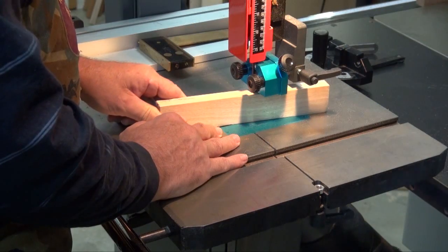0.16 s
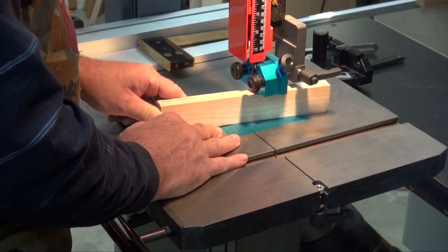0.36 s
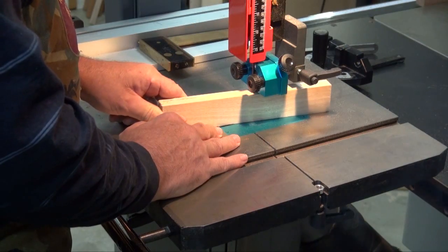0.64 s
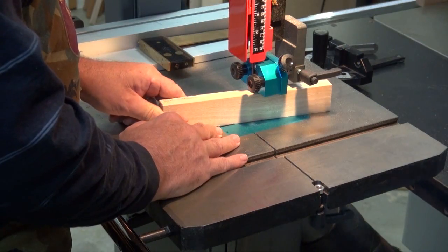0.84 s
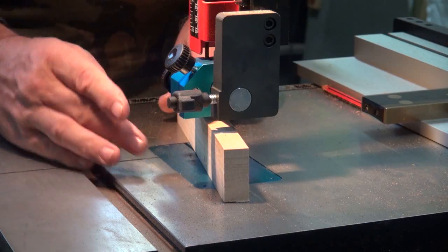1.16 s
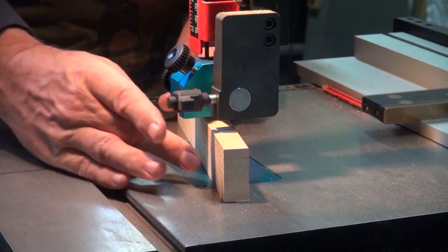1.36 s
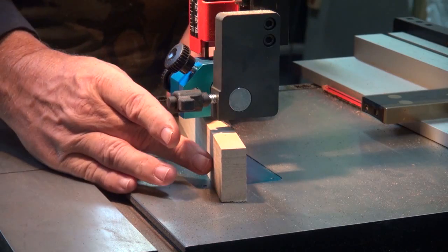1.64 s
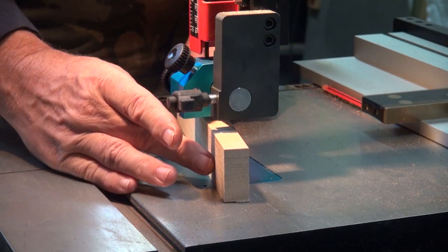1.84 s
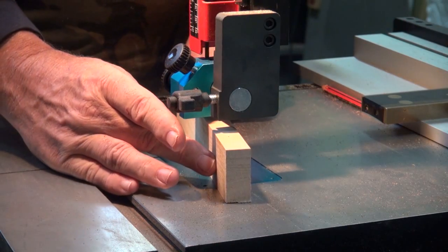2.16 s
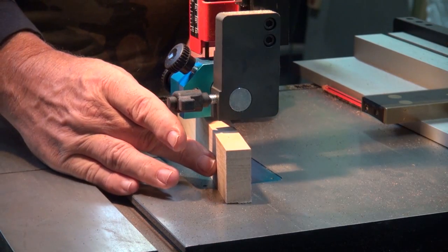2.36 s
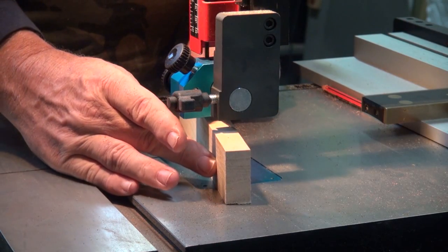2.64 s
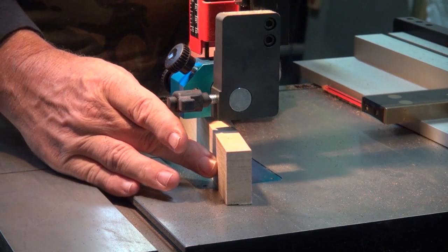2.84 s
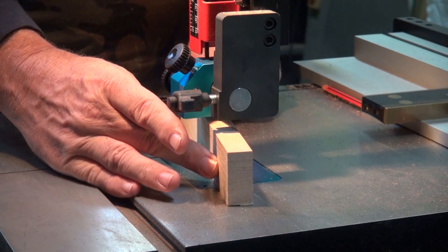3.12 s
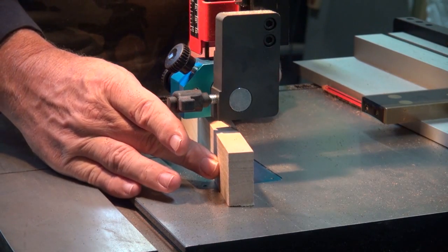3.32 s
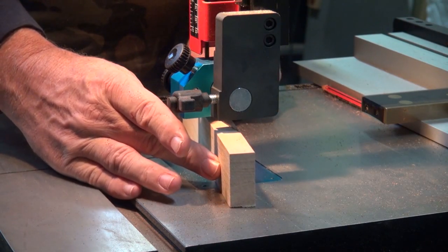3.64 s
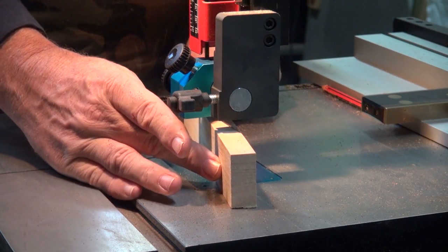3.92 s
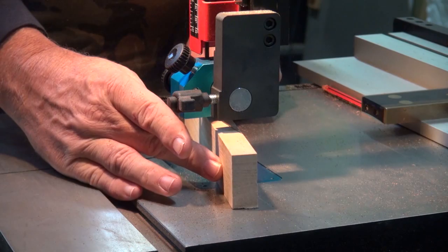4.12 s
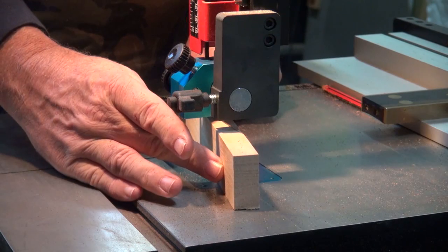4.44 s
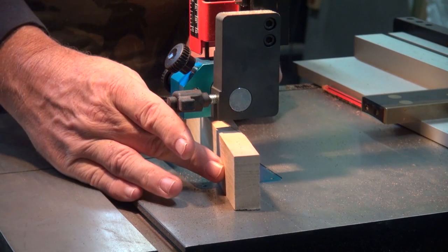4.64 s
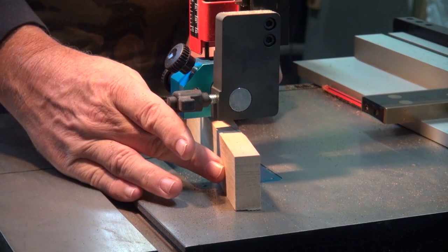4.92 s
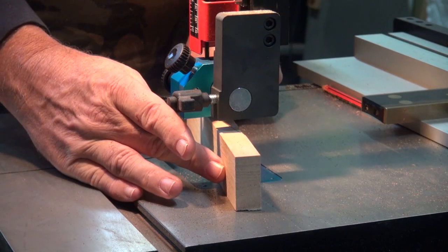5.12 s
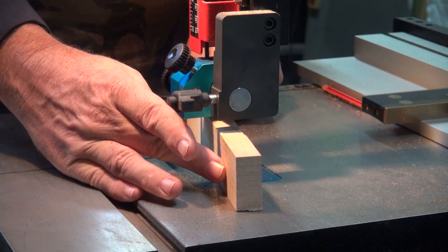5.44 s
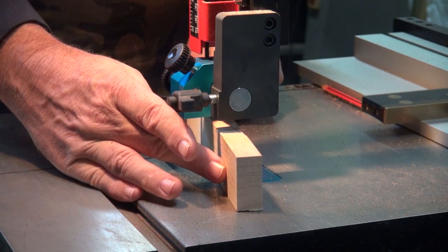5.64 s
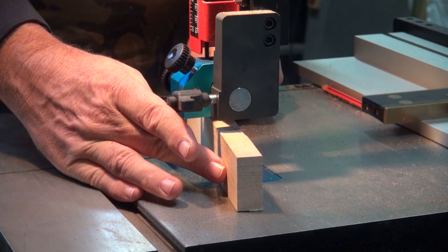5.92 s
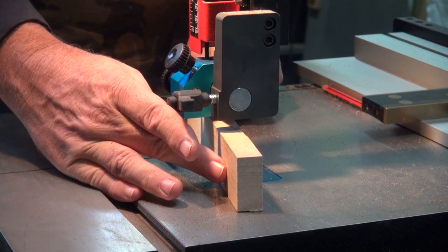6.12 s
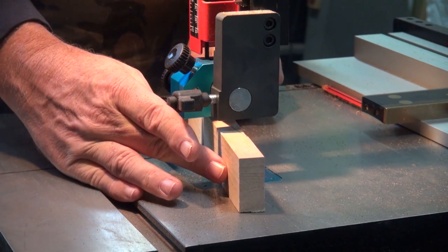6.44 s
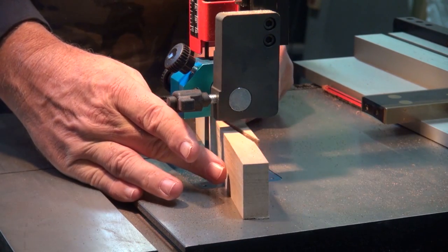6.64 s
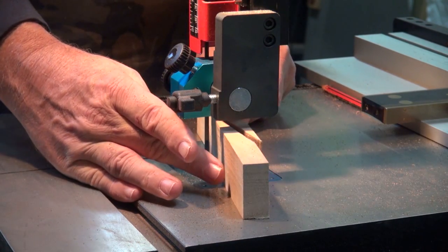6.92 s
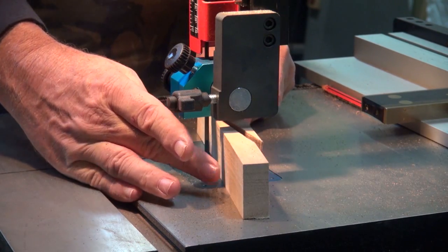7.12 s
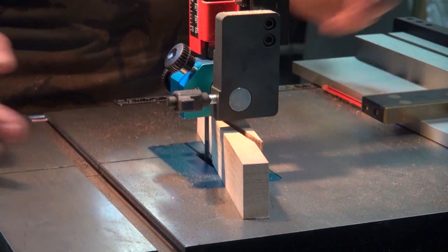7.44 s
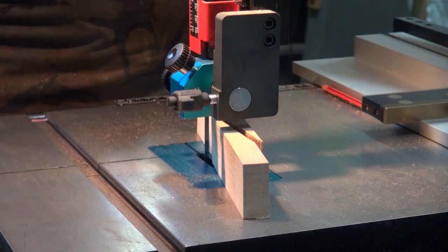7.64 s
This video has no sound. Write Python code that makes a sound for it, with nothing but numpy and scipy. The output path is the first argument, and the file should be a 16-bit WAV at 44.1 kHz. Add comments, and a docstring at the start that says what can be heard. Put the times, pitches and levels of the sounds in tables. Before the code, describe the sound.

In a workshop, a bandsaw blade whines and hisses steadily through wood, with the microphone at its side. Suddenly the microphone is close in front, and a quieter cut builds into a rough, warbling whine with brief squeals and a thin metallic ring. The cutting eases and ends, the freed sliver ticks against the block, and the hum and rattle of the motor come forward as the blade runs free.

```python
"""A workshop, at the bandsaw: a hand-fed block of wood is ripped, one cut with the microphone at the
side, then abruptly another with it close in front. The teeth whine and rasp; the motor rattles the
frame, lifted by the recorder's gain where the cut is quiet. In the second cut the pushed blade chatters
just under the tooth rate, squeals and rings. Near the end it breaks through, the offcut ticks and the
saw runs on empty."""
import sys
import numpy as np
from scipy import signal
from scipy.fft import rfft, irfft, next_fast_len
from scipy.io import wavfile

SR = 44100
rng = np.random.default_rng(int(sys.argv[2]) if len(sys.argv) > 2 else 0)


def dump(signal):
    """Clip the signal to [-1, 1] and save it as 16-bit WAV at the path in sys.argv[1]."""
    limited = np.clip(np.atleast_2d(signal).T, -1, 1)
    pcm = np.round(limited * 32767).astype(np.int16)
    wavfile.write(sys.argv[1], SR, pcm)


N = 343083
TIME = np.arange(N) / SR
FREE_TOOTH_HZ, TEETH_PER_MOTOR_TURN, TEETH_PER_WHEEL_TURN = 1250, 50, 232


def undb(db):
    """Decibels to gain."""
    return 10 ** (np.asarray(db) / 20)


def unit(x):
    """Scale to rms 1."""
    return x / np.sqrt(np.mean(np.abs(x) ** 2))


def curves(rows):
    """The columns of a timed table, sample by sample."""
    times, *columns = np.transpose(rows)
    return [np.interp(TIME, times, column) for column in columns]


def step(at_s, width_s):
    """A smooth change from 0 to 1."""
    return .5 + .5 * np.tanh((TIME - at_s) / width_s)


def bump(at_s, width_s):
    """One smooth rise to 1 and back."""
    return np.exp(-((TIME - at_s) / width_s) ** 2)


def swell(period_s, peak_s):
    """A regular rise and fall between -1 and 1."""
    return np.cos(2 * np.pi * (TIME - peak_s) / period_s)


def phase_of(hz):
    """Phase in radians of a moving rate."""
    return 2 * np.pi * np.cumsum(hz) / SR


def wander(hz):
    """A smooth random drift of rms 1 that changes up to about hz times a second."""
    hop = max(1, int(SR / hz) // 20)
    count = N // hop + 2
    lowpass = signal.butter(2, hz * hop / SR * 2, output="sos")
    slow = signal.sosfilt(lowpass, rng.standard_normal(N + 2)[:count])
    return unit(np.interp(np.arange(N) / hop, np.arange(count), slow))


def resonance(hz, width_hz):
    """A mode shaken at random: a tone whose size and phase drift over its width."""
    phase = phase_of(hz * np.ones(N))
    return unit(wander(width_hz / 2) * np.cos(phase) + wander(width_hz / 2) * np.sin(phase))


def gain_at(spectrum, hz):
    """Read a gain from (freq_hz, level_db) points on a log axis."""
    freq_hz, level_db = np.transpose(spectrum)
    return undb(np.interp(np.log(hz + 1), np.log(freq_hz), level_db))


def shape(x, response):
    """Filter by a gain that is a function of frequency."""
    size = next_fast_len(N + 4096)
    return irfft(rfft(x, size) * response(np.fft.rfftfreq(size, 1 / SR)), size)[:N]


def colour(x, spectrum):
    """Give a sound a spectrum, at rms 1."""
    return unit(shape(x, lambda hz: gain_at(spectrum, hz)))


def cut_gain(hz, cut_db):
    """Gain of a partial: low ones go with the blade's note, higher ones with rasp and sizzle."""
    bands = ([1, 0, 0, 0], [0, 1, 1, 0], [0, 0, 0, 1])
    shares = [np.interp(hz, [1300, 3400, 5200, 7200], band) for band in bands]
    return undb(sum(share * db for share, db in zip(shares, cut_db)))


# Strength of the cut as the hand feeds the wood: time_s, rasp_db, sizzle_db
FEED = [(0, -33.5, -34), (0.15, -31.5, -36), (0.8, -30, -33.5), (1.36, -30.5, -33.5), (1.47, -40.5, -48),
        (1.6, -38, -42.5), (2.02, -35, -40), (2.13, -30, -33), (3.0, -30, -35), (3.27, -31, -32),
        (3.8, -31.5, -35), (4.57, -30.5, -33), (4.92, -33, -37), (6.17, -35, -41.5), (6.45, -37, -38.5),
        (6.66, -48, -55), (7.2, -44.5, -49.5), (7.78, -47.5, -56.5)]
# The hand shoves or eases off, and the blade's note surges or drops: peak_s, width_s, change_db
HAND_SHOVES = [(1.385, 0.036, -4), (2.225, 0.041, 3), (4.126, 0.045, 3), (4.416, 0.054, 3.5),
               (4.74, 0.065, 1), (6.03, 0.025, -7)]


def hand_feed(front, in_wood, full_cut_db=-31, sway_db=1.1, sway_hz=4.7, stumble_db=1.5):
    """Levels in dB of the blade's note, rasp and sizzle, all following the feed."""
    rasp_db, sizzle_db = curves(FEED)
    # the note sways evenly in the first cut and stumbles in the second
    uneven_db = sway_db * (1 - front) * swell(1 / sway_hz, peak_s=.41) + stumble_db * front * wander(12)
    shove_db = sum(db * bump(peak_s, width_s) for peak_s, width_s, db in HAND_SHOVES)
    note_db = full_cut_db + 1 + 0.83 * (rasp_db - full_cut_db) + uneven_db + shove_db
    # once through, the blade brushes the wood on every wheel turn
    brush_db = 1.3 * (1 - in_wood) * swell(TEETH_PER_WHEEL_TURN / FREE_TOOTH_HZ, peak_s=5.5)
    return note_db, rasp_db + brush_db, sizzle_db + brush_db


# Tooth harmonics 1 to 7 by microphone position and feed: side_db, front_light_db, front_heavy_db
TOOTH_HARMONICS = [(-1, -4, -8.5), (-17, -13.5, -33), (-10.5, -7.5, -20), (-3.5, -13.5, -14),
                   (-15, -12.5, -22), (-13.5, -5.5, -9.5), (-9, -4.5, -5)]
# How cleanly those harmonics ring: time_s, boost_db
CLARITY = [(0, 2.5), (1.3, -0.5), (1.45, -2.5), (1.8, -5), (1.92, -6), (2.08, -4), (3.6, 0.5), (4.4, 1),
           (5.6, 0), (6.35, 3), (6.55, 4.5)]
# Teeth set alternately left and right add half orders: tooth_rate_multiple, relative_db
HALF_ORDERS = [(.5, -23), (2.5, -21)]


def whine(tooth_phase, load, front, cut_db, side_jitter_rad=0.19, front_jitter_rad=0.069, flutter_db=1.5):
    """Teeth strike in step; the blade's shiver shifts their timing and frays the upper harmonics."""
    phase = tooth_phase + (side_jitter_rad * (1 - front) + front_jitter_rad * front) * wander(38)
    clarity_db, = curves(CLARITY)
    out = 0
    for k, (side_db, light_db, heavy_db) in enumerate(TOOTH_HARMONICS, 1):
        front_db = light_db + (heavy_db - light_db) * load ** 2
        level_db = side_db * (1 - front) + front_db * front + clarity_db
        level_db += (flutter_db + 1.9 * (1 - front) * (k > 2)) * wander(30)
        # the steel delays each harmonic differently, which smears the strikes into a steady tone
        tone = np.sin(k * phase + rng.uniform(0, 2 * np.pi))
        out += undb(level_db) * cut_gain(k * FREE_TOOTH_HZ, cut_db) * tone
    for k, db in HALF_ORDERS:
        level_db = db - 7.9 * load ** 2 + flutter_db * wander(25)
        out += undb(level_db) * cut_gain(k * FREE_TOOTH_HZ, cut_db) * np.sin(k * phase)
    return np.sqrt(2) * out


# Tearing wood, microphone at the side: freq_hz, relative_db
RASP_AT_SIDE = [(40, -33), (200, -12.5), (700, -6), (1450, 1.5), (2500, -5), (3400, -2.5), (3900, 5),
                (4300, -6), (4700, 5), (5150, 2), (5600, -5.5), (6800, -6), (8100, -4), (8900, 0.5),
                (9600, -2)]
# Tearing wood, microphone close in front: freq_hz, relative_db
RASP_IN_FRONT = [(40, -28.5), (250, -5.5), (700, -3), (1600, 2), (2100, -2.5), (2900, -6), (3350, 0),
                 (4200, -1), (5200, 0), (5750, -5.5), (6700, -5), (7700, 3), (8900, 1), (9600, -2)]


def rasp(tooth_phase, load, front, cut_db, bite=0.37, grain_db=1.0, side_db=-1, heavy_feed_db=-4):
    """Each tooth tears a burst of fibres; the bursts differ in size."""
    _, rasp_db, sizzle_db = cut_db
    bursts = rng.standard_normal(N) * (1 + bite * np.cos(tooth_phase)) * undb(grain_db * wander(350))
    at_side = colour(bursts, RASP_AT_SIDE) * undb(side_db)
    in_front = colour(bursts, RASP_IN_FRONT) * undb(heavy_feed_db * load)
    tearing = at_side * (1 - front) + in_front * front
    sizzle = shape(tearing, lambda hz: np.clip((hz - 5200) / 2000, 0, 1))
    return (tearing - sizzle) * undb(rasp_db + 4) + sizzle * undb(sizzle_db + 7.5)


def wheel_throb(tooth_phase, depth_db=0.77):
    """The wheels run slightly untrue, so the blade presses unevenly in the same way on every turn."""
    angle = tooth_phase / TEETH_PER_WHEEL_TURN
    offsets = rng.uniform(0, 2 * np.pi, size=8)
    pressure = sum(np.sin(k * angle + offset) for k, offset in enumerate(offsets, 1))
    return undb(depth_db * unit(pressure))


# Motor orders that stand out as hum: turning_rate_multiple, relative_db
HUM_ORDERS = [(15, -22), (21, -7), (22, -11), (24, -15), (35, -16), (37, -15), (40, -15), (41, -16),
              (44, -9), (46, -12)]
# The rattle that repeats every motor turn: freq_hz, relative_db
TURN_RATTLE = [(30, -34.5), (100, -20.5), (330, -15.5), (425, -10), (480, 0), (550, 2), (620, 2),
               (720, -8.5), (880, -5), (1150, 2), (1330, 2), (1500, -20.5), (2400, -22.5)]
# Loose noise of the frame and covers: freq_hz, relative_db
FRAME_NOISE = [(30, -32), (120, -19.5), (185, -13), (212, 5), (248, 3.5), (290, -6), (410, -9.5), (520, 3),
               (660, 0), (760, -4.5), (900, -2.5), (1150, -7.5), (1450, -5), (1900, -6)]
# The recorder's gain control lifts the motor noise where the cut is quiet: time_s, gain_db
RECORDER_GAIN = [(0, -46), (1.3, -46), (1.55, -42.5), (1.88, -35.5), (2.16, -37), (2.4, -44), (3.5, -46),
                 (4.8, -44.5), (5.3, -40), (6.4, -38), (6.75, -36.5), (7.0, -32), (7.45, -35), (7.78, -35)]


def motor_and_frame(tooth_phase, in_wood, knock=0.11, free_hum_db=2, boom_edge_hz=290, base_gain_db=-44):
    """The motor shakes the frame: a rattle that repeats every turn, loose noise and a hum."""
    angle = tooth_phase / TEETH_PER_MOTOR_TURN
    orders = np.arange(2049)
    rattles = (orders > 0) & (orders < 100) & ~np.isin(orders, [k for k, _ in HUM_ORDERS])
    weights = gain_at(TURN_RATTLE, orders * FREE_TOOTH_HZ / TEETH_PER_MOTOR_TURN) * rattles
    one_turn = irfft(weights * np.exp(2j * np.pi * rng.random(len(orders))))
    rattle = unit(np.interp(angle / (2 * np.pi) % 1, np.linspace(0, 1, len(one_turn)), one_turn))
    knocking = rng.standard_normal(N) * (1 + knock * np.cos(angle))
    loose = colour(knocking, FRAME_NOISE + [(2700, -28), (6000, -24.5)])
    hum = 0
    for k, db in HUM_ORDERS:
        level_db = db + 2.2 * wander(5) + free_hum_db * (1 - in_wood)
        hum += undb(level_db) * np.sqrt(2) * np.sin(k * angle + rng.uniform(0, 2 * np.pi))
    motor = undb(-3) * (rattle + loose) + hum
    gain_db, = curves(RECORDER_GAIN)
    # as the gain comes up, the cabinet's low boom rises less than the rest
    boom = shape(motor, lambda hz: 1 / (1 + (hz / boom_edge_hz) ** 10))
    boom_db = base_gain_db + 1.5 + 0.65 * (gain_db - base_gain_db)
    return undb(gain_db) * (motor - boom) + undb(boom_db) * boom


# The blade's chatter in the kerf, from close in front: time_s, pitch_hz, relative_db
CHATTER_NOTE = [(1.4, 1198, 2), (1.55, 1200, -22), (1.95, 1111, -9.5), (2.2, 1191, 0), (2.8, 1183, -3),
                (3.4, 1209, -1), (3.75, 1159, -1.5), (4.55, 1153, -1), (4.75, 1140, 1), (5.0, 1174, -3.5),
                (5.4, 1158, -3), (5.8, 1227, -4), (6.1, 1208, -9), (6.35, 1162, -11), (6.57, 1190, -26)]
# Modes of blade and block, each strongest at one stretch of the kerf:
# pitch_hz, glide_share, width_hz, relative_db, peak_s, span_s
CHATTER_MODES = [(368.4, 0.05, 16, -16, 5.38, 0.13), (1211, .7, 240, -8, 3.95, 1.03),
                 (1743, 0, 180, -16, 6.4, 0.36), (2383, 0.6, 200, -15.5, 5.3, 3.8),
                 (2542, 0.04, 170, -13, 6.1, 0.42), (3648, .6, 280, -6.5, 3.25, 1.35),
                 (4385, 0, 200, -2, 1.73, 0.24), (4400, 0.01, 260, -7, 3.1, 0.71),
                 (4893, .4, 170, -2, 2.66, 0.62), (6080, 0.2, 240, -13, 3.23, 1.1),
                 (7440, .7, 200, -2.5, 3.65, 0.32), (8690, 0.6, 250, -2, 3.4, 1.55)]


def chatter(cut_db, warble_hz=19, flutter_db=2, nominal_hz=1200):
    """The pushed blade shudders sideways: a warbling note, and ragged modes that glide with it."""
    pitch_hz, relative_db = curves(CHATTER_NOTE)
    pitch_hz += warble_hz * wander(58)
    level_db = cut_db[0] + relative_db + flutter_db * wander(80)
    out = np.sqrt(2) * np.sin(phase_of(pitch_hz)) * undb(level_db)
    glide = pitch_hz / nominal_hz - 1
    for hz, glide_share, width_hz, db, peak_s, span_s in CHATTER_MODES:
        envelope = 1 / np.hypot(1, (TIME - peak_s) / span_s)
        mode = resonance(hz * (1 + glide_share * glide), width_hz)
        out += undb(db) * envelope * cut_gain(hz, cut_db) * mode
    return out


# The blade squeals as it enters and leaves the wood: peak_s, width_s, harmonic, level_db
BLADE_SQUEALS = [(1.92, 0.035, 3, -34), (6.38, 0.13, 5, -44), (6.44, .06, 4, -41)]


def squeals(tooth_phase, jitter_rad=.3):
    """Under a light touch one tooth harmonic swells and fades."""
    shiver = jitter_rad * wander(40)
    return np.sqrt(2) * sum(undb(db) * bump(peak_s, width_s) * np.sin(k * tooth_phase + shiver)
                            for peak_s, width_s, k, db in BLADE_SQUEALS)


def blade_ring(pitch_hz=2439, drift_hz=11, start_s=2.22, end_s=5.1, lap_s=0.372, flutter_db=3):
    """Deep in the wood a lightly damped mode of the blade sings, swelling once per lap of the band."""
    tone = np.sqrt(2) * np.sin(phase_of(pitch_hz + drift_hz * wander(30)))
    level_db = -42 + 2 * swell(lap_s, peak_s=2.546) + flutter_db * wander(20)
    return tone * undb(level_db) * step(start_s, 0.031) * (1 - step(end_s, .12))


# Ring of the offcut: pitch_hz, width_hz, relative_db
OFFCUT_MODES = [(1600, 200, -2), (2620, 45, 0), (3150, 300, -2)]


def offcut_tick(start_s=6.62, ring_db=-37.5, crack_db=-33, crack_decay_s=.003):
    """The freed sliver ticks against the block: a dry crack and a short ring."""
    age = np.maximum(TIME - start_s, 0)
    ring = sum(undb(db) * np.exp(-np.pi * width_hz * age) * np.sin(2 * np.pi * hz * age)
               for hz, width_hz, db in OFFCUT_MODES)
    crack = resonance(2600, width_hz=1800) * np.exp(-age / crack_decay_s) * (age > 0)
    return undb(ring_db) * ring + undb(crack_db) * crack


# Blade speed, sagging under load: time_s, tooth_rate_hz
BLADE_SPEED = [(0, 1234.5), (1.38, 1233.5), (1.48, 1249), (1.9, 1248), (2.3, 1240), (3.4, 1238),
               (4.4, 1238.5), (5.15, 1242.5), (6.4, 1245), (6.65, 1250), (7.78, 1250)]


def scene(second_cut_s=1.366, through_s=6.57, full_sag_hz=12):
    """The blade's speed times teeth, wheels and motor; its sag tells how hard the wood is pushed."""
    tooth_hz, = curves(BLADE_SPEED)
    tooth_phase = phase_of(tooth_hz + 0.7 * wander(6))
    load = np.clip((FREE_TOOTH_HZ - tooth_hz) / full_sag_hz, 0, 1)
    front = step(second_cut_s, 0.031)  # microphone: 0 at the side, 1 close in front
    in_wood = 1 - step(through_s, 0.034)
    cut_db = hand_feed(front, in_wood)
    blade = whine(tooth_phase, load, front, cut_db) + front * chatter(cut_db)
    blade += blade_ring() + squeals(tooth_phase)
    cutting = (in_wood * blade + rasp(tooth_phase, load, front, cut_db)) * wheel_throb(tooth_phase)
    return (cutting + motor_and_frame(tooth_phase, in_wood) + offcut_tick())[None]


def record(dry, low_cut_hz=38, top_hz=9620):
    """One microphone, into a recorder that thins the deepest bass and cuts the top steeply."""
    thinned = signal.sosfilt(signal.butter(2, low_cut_hz, "high", fs=SR, output="sos"), dry)
    return np.array([shape(x, lambda hz: np.clip((top_hz - hz) / 60 + .5, 0, 1)) for x in thinned])


dry = scene()
out = record(dry)
dump(out)
```